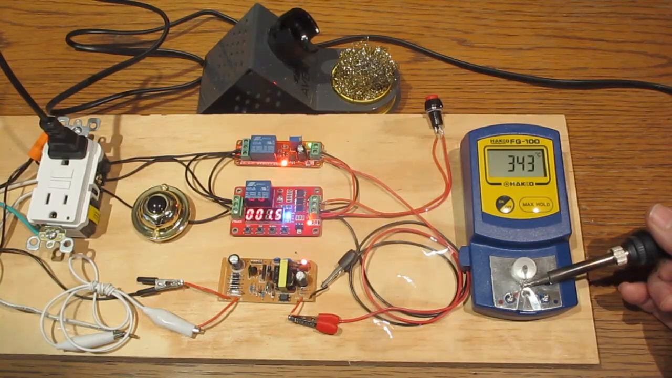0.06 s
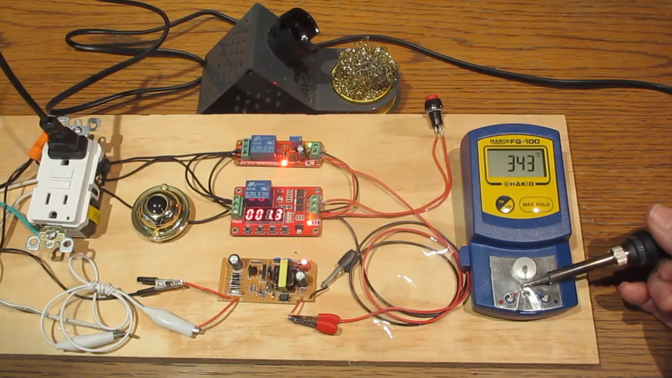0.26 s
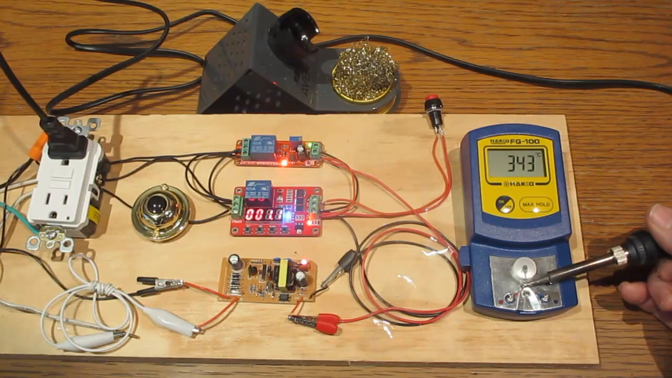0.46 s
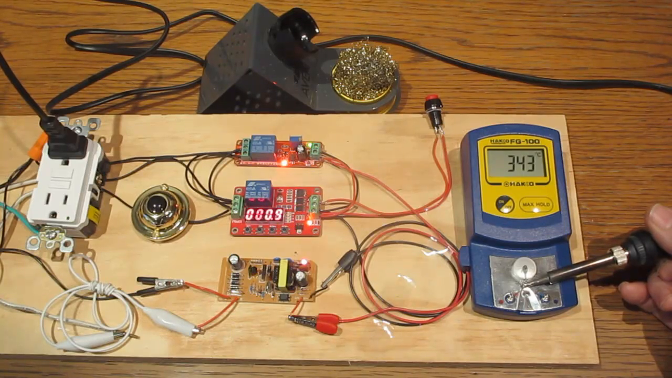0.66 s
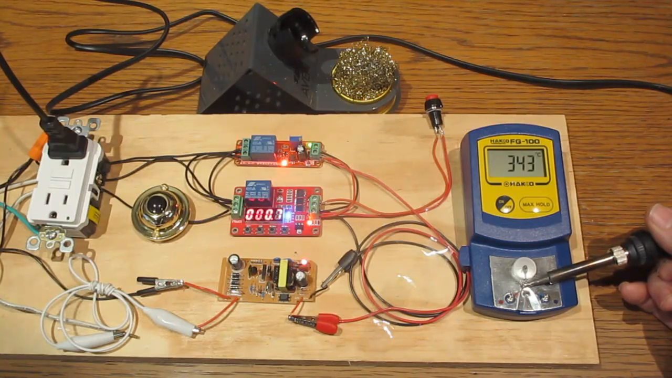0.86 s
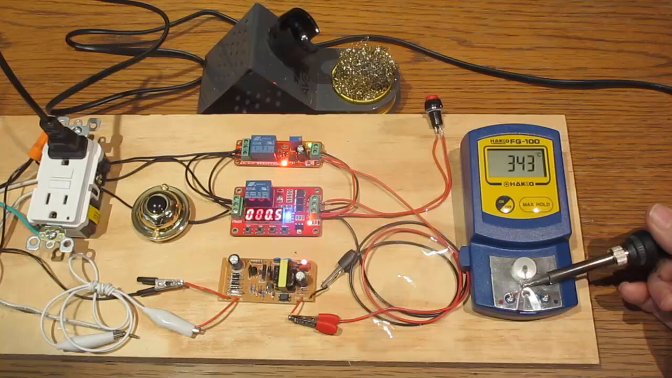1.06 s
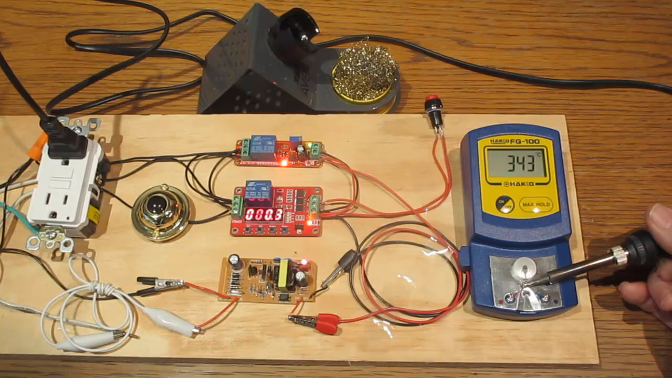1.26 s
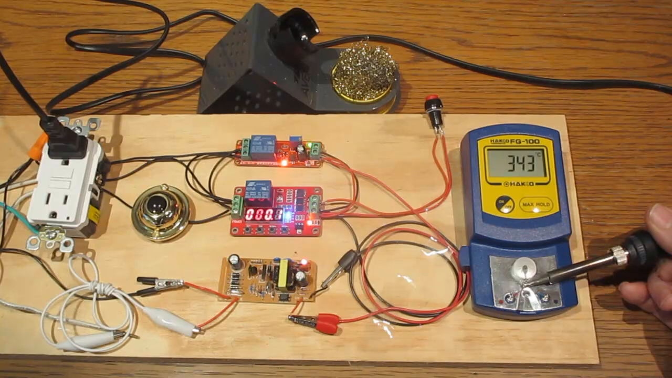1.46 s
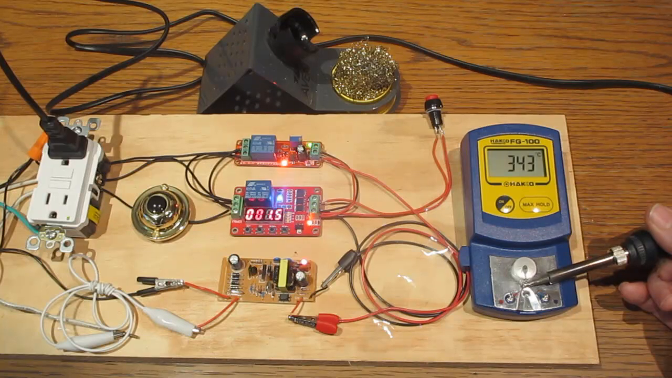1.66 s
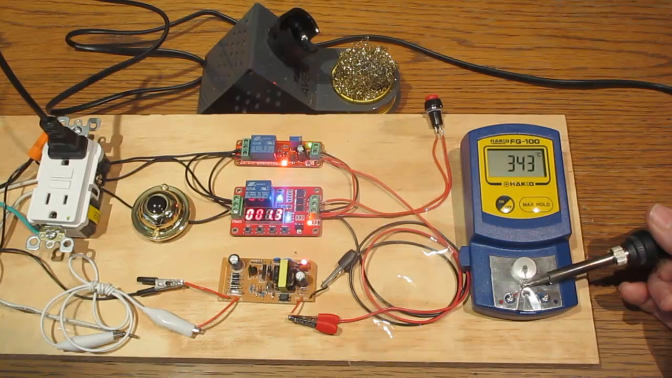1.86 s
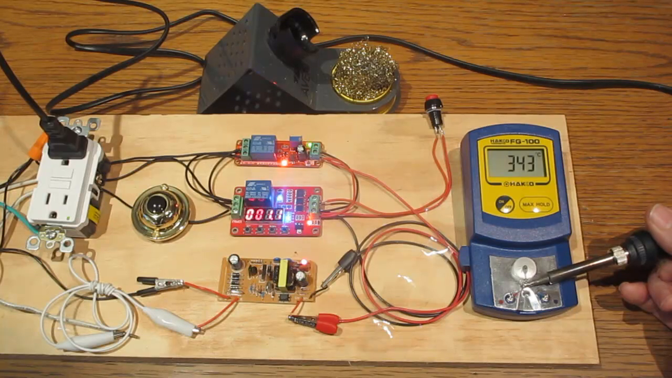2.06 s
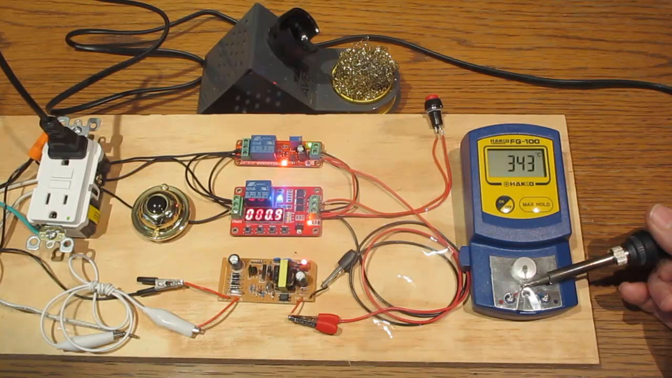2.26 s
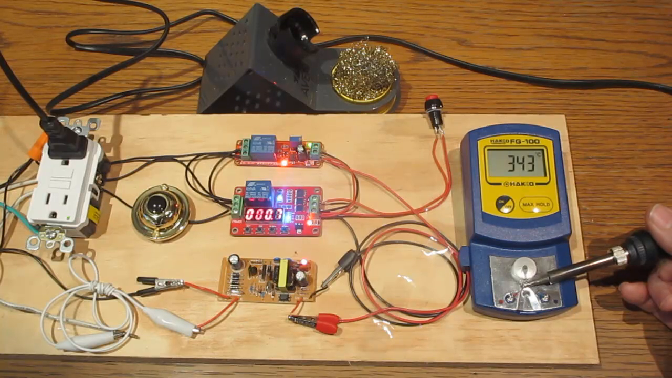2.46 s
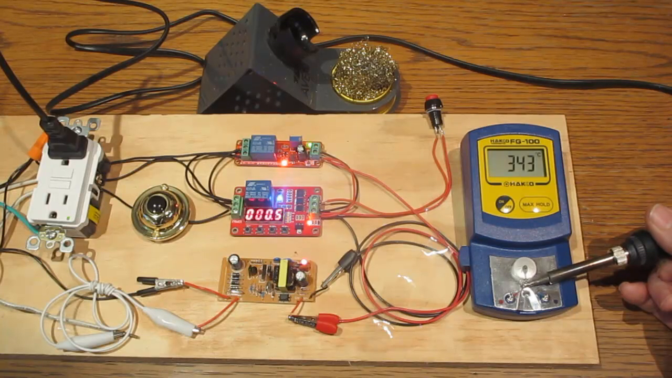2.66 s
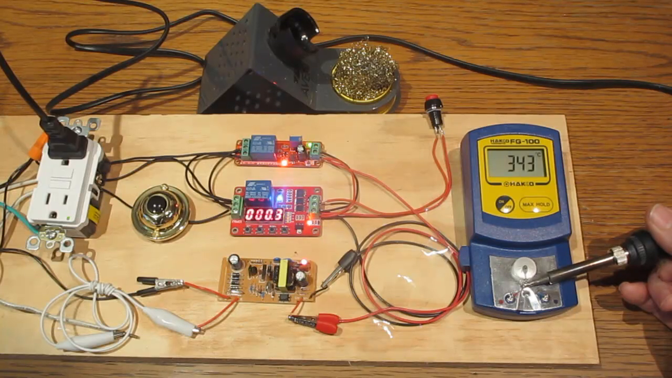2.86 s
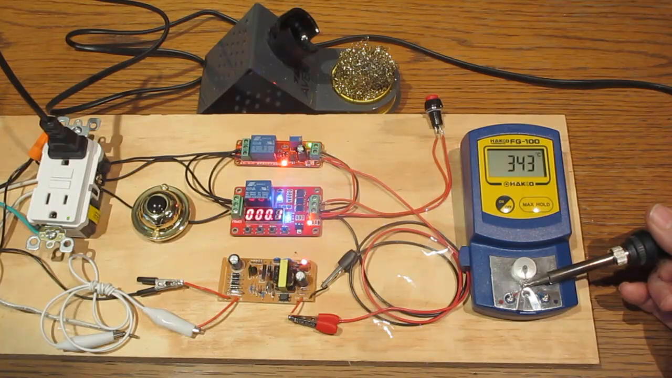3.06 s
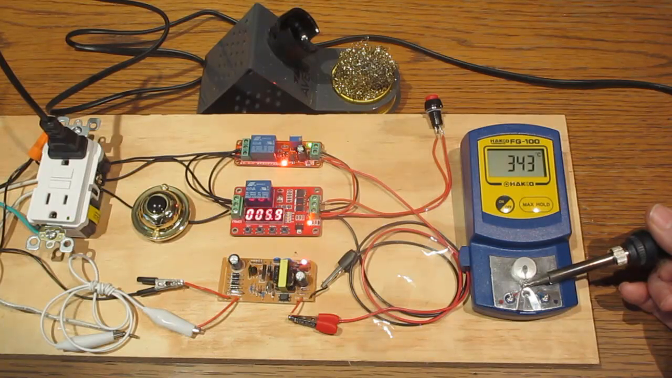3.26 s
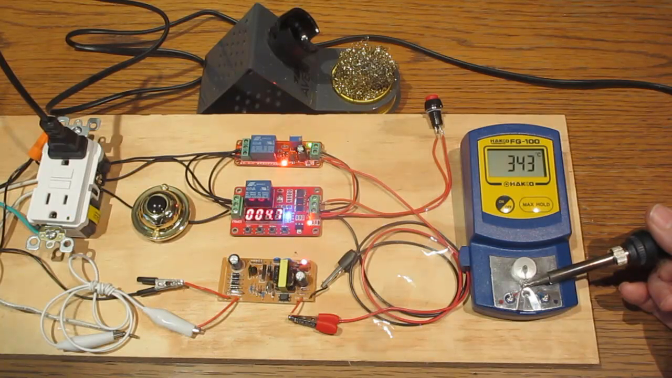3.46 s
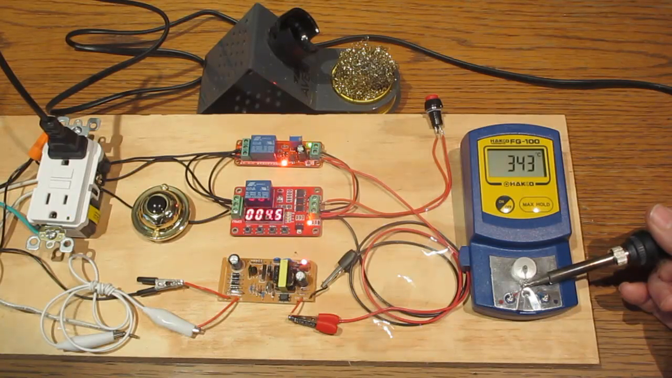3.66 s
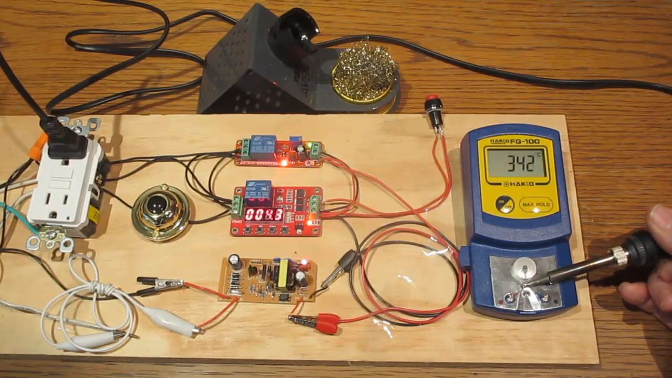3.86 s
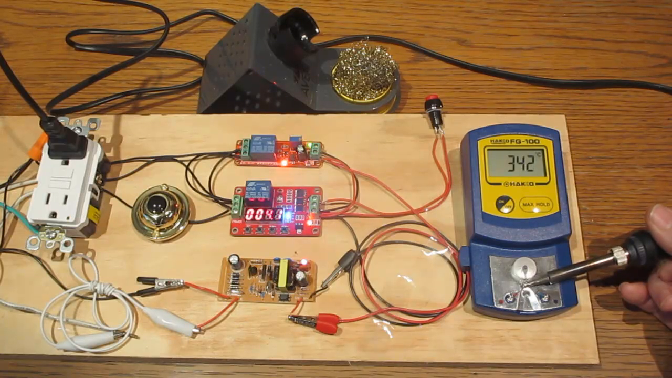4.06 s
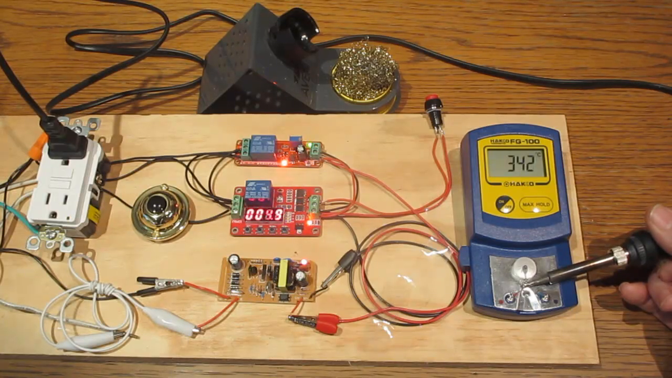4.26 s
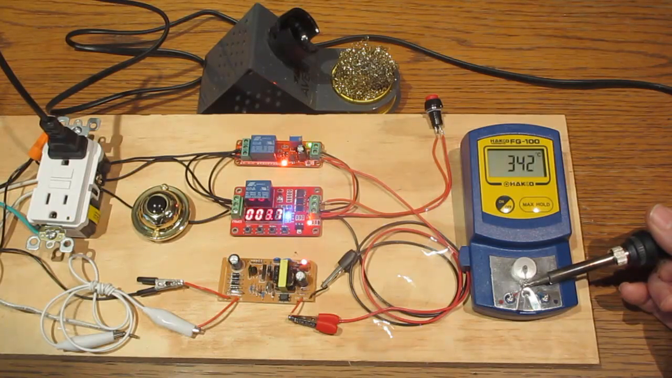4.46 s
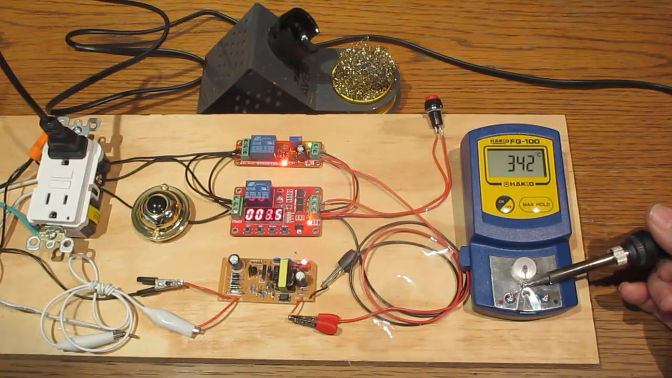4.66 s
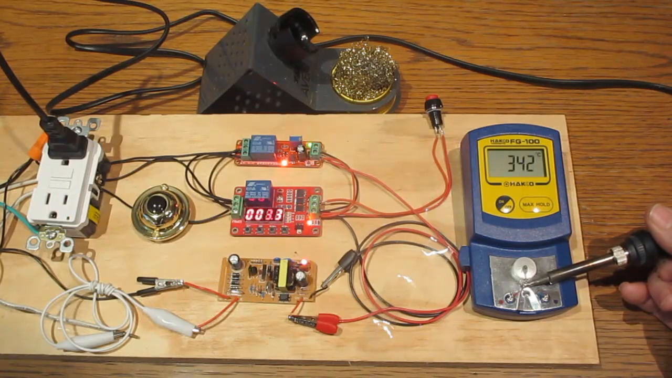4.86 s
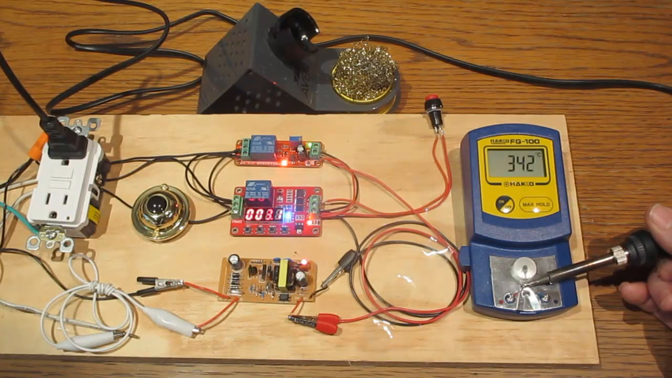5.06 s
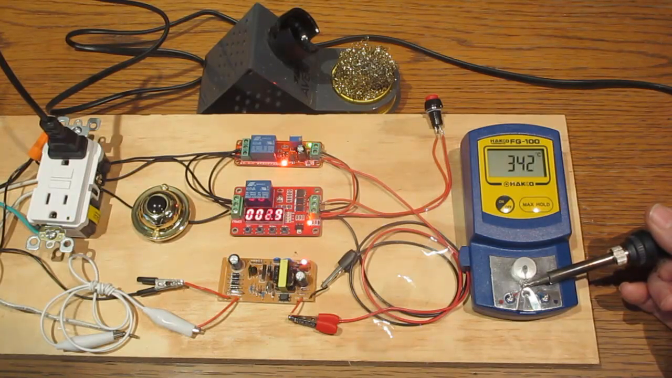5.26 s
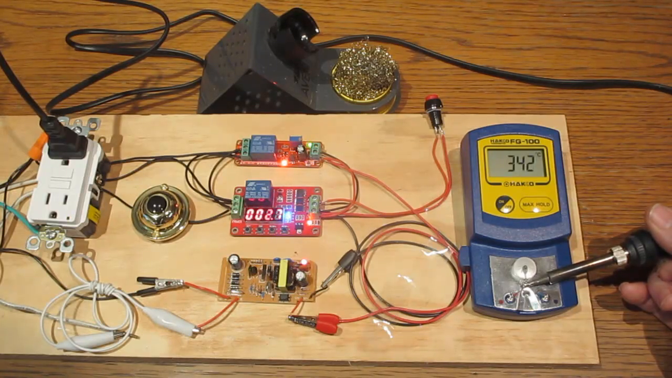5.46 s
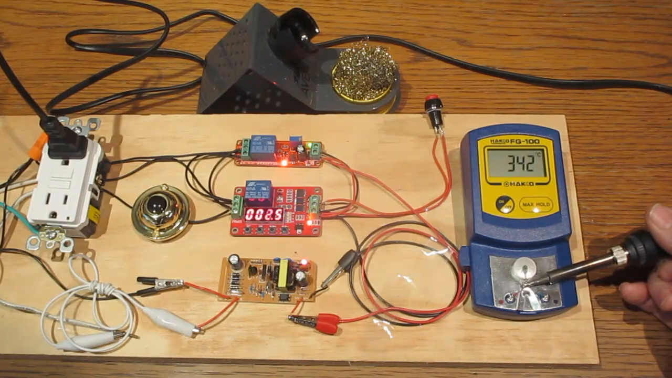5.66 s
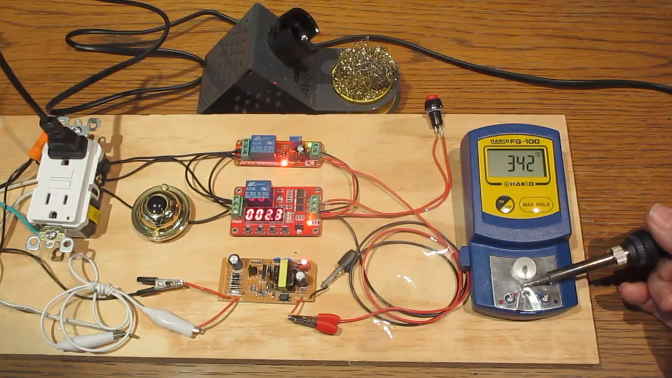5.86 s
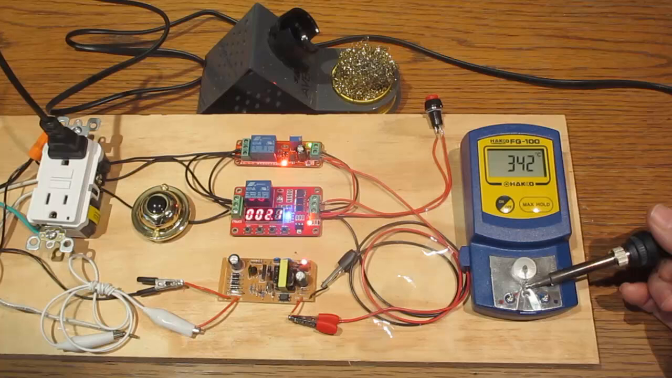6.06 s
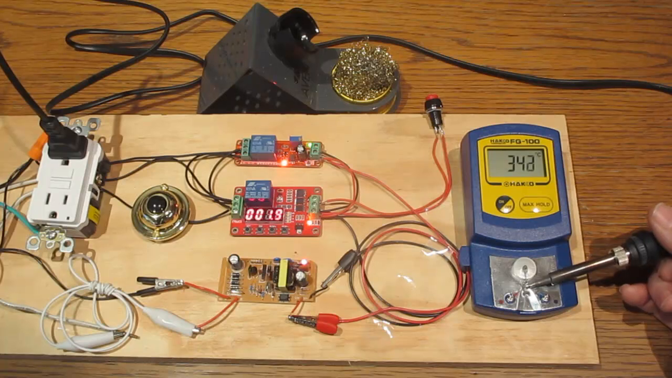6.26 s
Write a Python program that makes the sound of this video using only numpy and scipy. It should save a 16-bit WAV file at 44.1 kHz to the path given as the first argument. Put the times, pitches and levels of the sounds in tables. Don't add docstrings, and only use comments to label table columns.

```python
import sys
import numpy as np
from scipy import signal
from scipy.fft import rfft, irfft
from scipy.io import wavfile
from scipy.ndimage import uniform_filter1d

SR = 44100
rng = np.random.default_rng(int(sys.argv[2]) if len(sys.argv) > 2 else 0)


def to_wav(sig):
    pcm = np.clip(np.atleast_2d(sig), -1, 1) * 32767
    pcm = np.round(pcm).astype(np.int16)
    wavfile.write(sys.argv[1], SR, pcm.T)


def boost(x):
    u = np.asarray(x, float) / 20
    return 10 ** u


N = 278271
T = np.arange(N) / SR


def level(x, db):
    return x * boost(db) / np.sqrt(np.mean(x ** 2))


def curve(rows, rise_s, fall_s):
    total = 0
    for s, db in rows:
        after = np.maximum(T - s, 0) / fall_s
        before = np.minimum(T - s, 0) / rise_s
        total = total + boost(db) * np.exp(-after - before ** 2)
    return total


def colour(x, points, share=1):
    hz, db = np.transpose(points)
    f = np.maximum(np.fft.rfftfreq(N, 1 / SR), 1)
    gain_db = share * np.interp(np.log(f), np.log(hz), db)
    return irfft(rfft(x) * boost(gain_db), N)


def walk(rate):
    hold = int(SR / rate)
    steps = np.repeat(rng.standard_normal(N // hold + 1), hold)
    return 1.193 * uniform_filter1d(uniform_filter1d(steps, hold), hold)[:N]


def air():
    # pitch in Hz, level in dB per Hz.
    air_mid = [(88, -47.5), (150, -8), (208, -9.5), (240, -4), (272, -12), (303, -3), (326, -9.5),
               (494, -11), (521, -12.5), (581, -13.5), (1050, -17), (4080, -37.5), (8390, -41),
               (10200, -39), (11200, -40), (14600, -87), (22000, -120)]
    # pitch in Hz, level in dB per Hz.
    air_side = [(24, -35), (40, -35), (85, -28), (143, -21.5), (185, -18.5), (297, -7), (358, -2.5),
                (744, -6.5), (1040, 0.5), (1620, -10.5), (4360, -23), (8050, -25.5), (10400, -28.5),
                (11200, -42), (14600, -78), (22000, -120)]
    # pitch in Hz, left minus right in dB.
    air_balance = [(60, 0.0), (110, 0.0), (190, 0.0), (340, 0.0), (610, 0.0), (1090, 5.0), (1960, 1.5),
                   (3500, 0.0), (6250, 0.5), (11200, 0.0)]
    mid = level(colour(rng.standard_normal(N), [(90, -51.5)] + air_mid), -50.5)
    side = level(colour(rng.standard_normal(N), air_side), -57)
    left = colour(mid + side, air_balance, share=0.55)
    right = colour(mid - side, air_balance, share=-0.5)
    return np.array([left, right]) * boost(0.36 * walk(1.2))


def rumble():
    # pitch in Hz, level in dB per Hz.
    rumble_colour = [(20, -19.5), (35, 2.5), (48, 9), (65, 7.5), (80, 6), (97, 15.5), (115, 9), (140, 12),
                     (180, -9.5), (240, -41)]
    leaving_db, leaving_s = 6, 1.5
    rumble_db = -59 + leaving_db * np.exp(-T / leaving_s) + 0.7 * walk(3)
    return level(colour(rng.standard_normal(N), rumble_colour), 0) * boost(rumble_db)


def thuds():
    # moment in seconds, level in dB.
    knocks = [
        (.5, -48),
        (1.19, -55),
        (5.31, -61),
    ]
    thud_hz, thud_s = 95.9, 0.064
    return np.sqrt(2) * np.sin(2 * np.pi * thud_hz * T) * curve(knocks, thud_s, thud_s)


def duct():
    # pitch in Hz, width in Hz, level in dB.
    resonances = [(229.4, 13, -59), (268, 12, -58), (277, 3, -60), (1300, 120, -66.5)]
    out = np.zeros(N)
    for hz, width_hz, db in resonances:
        b, a = signal.iirpeak(hz, hz / width_hz, SR)
        out = out + level(signal.lfilter(b, a, rng.standard_normal(N)), db)
    return out


def beating(hums):
    first_hz = hums[0][0]
    out = np.zeros(N)
    for hz, db, s in hums:
        turns = first_hz * T + (hz - first_hz) * (T - s)
        out = out + np.sqrt(2) * boost(db) * np.sin(2 * np.pi * turns)
    return out


def transformers_and_blades():
    # pitch in Hz, level in dB, moment in step with the first in seconds.
    mains_hums = [(120.019, -54.7, 0), (120.116, -58.2, 7.82), (120.587, -62.5, .509)]
    # pitch in Hz, level in dB, moment in step with
    # the first in seconds.
    upper_hums = [(244.353, -56.7, 0), (240.041, -63.6, .0186), (245.086, -66.3, .648)]
    return beating(mains_hums) + beating(upper_hums)


def tone(hz, wobble_db, drift_hz):
    loudness = boost(wobble_db * walk(3.88))
    turns = np.cumsum(hz + drift_hz * walk(2.5)) / SR
    return np.sqrt(2) * loudness * np.sin(2 * np.pi * turns)


def machine_tones():
    # pitch in Hz, level in dB, wobble in dB, drift in Hz.
    tones = [(300.04, -55.2, .3, .02), (838.5, -72, 2, .5), (490.16, -61.3, .3, .02), (737, -74, 2, .6)]
    return sum(boost(db) * tone(hz, wobble_db, drift_hz) for hz, db, wobble_db, drift_hz in tones)


def scrape():
    # moment in seconds, level in dB.
    catches = [
        (5.943, -54.5),
        (5.952, -54),
        (5.969, -49),
        (5.990, -49.5),
    ]
    # pitch in Hz, level in dB per Hz.
    scrape_colour = [(410, -53.5), (700, -23.5), (759, -8), (881, 1.5), (1520, -11), (1860, -1.5),
                     (3280, -18), (3900, -12), (4600, -18), (5500, -11), (7610, -17.5), (8640, -16),
                     (10600, -23), (11000, -39), (14300, -62), (22000, -120)]
    grain_db = 1.4 * rng.exponential(size=N) + 1.1 * walk(400)
    shared, apart = rng.standard_normal((2, N)) * boost(grain_db)
    grains = shared + 0.58 * apart * np.array([[1], [-1]])
    return level(colour(grains, scrape_colour), 0) * curve(catches, rise_s=0.0058, fall_s=0.012)


def room(s, axis):
    # pitch in Hz, width in Hz, pull-in level in
    # dB, drop-out level in dB.
    tail = [(2750, 780, -57, -75), (3450, 450, -86, -51.5), (4420, 770, -42.5, -50.5),
            (5880, 1000, -45.5, -51), (7300, 830, -46.5, -53.5), (8700, 500, -48, -47),
            (10300, 1100, -40.5, -66), (1480, 780, -59.5, -54), (5150, 500, -65, -60),
            (6660, 700, -75, -69), (8350, 550, -70, -53), (9500, 600, -72.5, -62)]
    room_t60_s, early_t60_s, early_db = 0.23, 0.054, 6
    onset_s, alike = 0.003, 0.49
    t = T[:SR // 2]
    shared, left, right = rng.standard_normal((3, len(t)))
    echoes = np.sqrt(alike) * shared + np.sqrt(1 - alike) * np.array([left, right])
    coloured = np.zeros((2, len(t)))
    for band in tail:
        hz, width_hz = band[:2]
        sos = signal.butter(4, [hz - width_hz / 2, hz + width_hz / 2], "band", fs=SR, output="sos")
        coloured += level(signal.sosfilt(sos, echoes), band[axis])
    walls = np.exp(-np.log(1000) * t / room_t60_s)
    bench = boost(early_db) * np.exp(-np.log(1000) * t / early_t60_s)
    start = int(s * SR)
    out = np.zeros((2, N))
    out[:, start:start + len(t)] = coloured * (1 - np.exp(-t / onset_s)) * (walls + bench)
    return out


def strike(modes, bounces, axis):
    # pitch in Hz, left minus right in dB.
    port_balance = [(2000, -.5), (4400, -2.3), (6000, -2.6), (7300, .5), (7900, 2.5), (8660, 5),
                    (10000, 4.5), (11000, 2)]
    port_lag_s, contact_s = 26e-6, 0.00005
    modes = np.array(modes)
    hz, t60, mode_db = (modes[:, k, None] for k in (0, 1, axis))
    pan_db = np.interp(hz, *np.transpose(port_balance))
    scatter = rng.standard_normal((len(bounces), len(modes), 1))
    out = np.zeros((2, N))
    for (s, blow_db, bright_db), chance in zip(bounces, scatter):
        start = int(s * SR)
        gain_db = mode_db + blow_db + bright_db * np.log2(hz / 6000) + 1.29 * chance
        for ear, sign in enumerate((1, -1)):
            t = np.maximum(T[start:start + SR // 20] - s - ear * port_lag_s, 0)
            ring = np.sin(2 * np.pi * hz * t) * np.exp(-np.log(1000) * t / t60)
            ring = ring * (1 - np.exp(-t / contact_s))
            out[ear, start:start + len(t)] += np.sum(boost(gain_db + sign * pan_db / 2) * ring, axis=0)
    return out


def relay(bounces, axis):
    # pitch in Hz, time to fade by 60 dB in seconds, pull-in level in dB, drop-out level in dB.
    case_modes = [(2680, .008, -25, -13), (3600, .008, -28, -3.5), (3838, 0.0091, -24, -26),
                  (4380, 0.012, 1.5, 5), (4600, 0.008, -9.5, -24), (5650, 0.0085, -8, -9),
                  (5883, 0.011, -7, 0.5), (7400, 0.0079, -5, -23), (7885, 0.01, -5, -3),
                  (8650, .010, -5.5, 0), (9300, .010, -19.5, -32), (9660, .010, -18, -35),
                  (9900, 0.0096, -10.5, -39), (10270, 0.0092, -8.5, -23), (10600, 0.0097, -9, -22)]
    # pitch in Hz, time to fade by 60 dB in seconds, pull-in level in dB, drop-out level in dB.
    board_modes = [(420, 0.027, -45.5, -35), (1040, 0.025, -33.5, -21), (1406, 0.018, -31.5, -24.5),
                   (2047, 0.0099, -41.5, -24)]
    radiates_hz = 3340
    sos = signal.butter(2, radiates_hz, "high", fs=SR, output="sos")
    case = signal.sosfilt(sos, strike(case_modes, bounces, axis))
    return case + strike(board_modes, bounces, axis)


def scene():
    # moment in seconds, blow in dB, brightness in dB per octave.
    pull_in = [
        (1.6226, -8, 0),
        (1.6234, -22.5, 10.5),
        (1.6241, -20.5, 10),
        (1.6252, -25, 0.5),
        (1.6284, -35, -0.5),
        (1.6325, -42, 4),
    ]
    # moment in seconds, blow in dB, brightness in dB per octave.
    drop_out = [
        (3.2227, -47, -6),
        (3.2238, -25, 23),
        (3.2244, -24.5, -2),
        (3.2251, -39, -6),
        (3.2264, -29.5, 20),
        (3.2277, -23, 4.5),
        (3.2287, -31.5, 6),
        (3.2305, -39, -6),
        (3.2355, -47, -10.5),
    ]
    # moment in seconds, depth in dB.
    ducks = [
        (1.63, -1.2),
        (3.23, -.4),
    ]
    duck_back_s = 0.25
    clicks = relay(pull_in, axis=2) + relay(drop_out, axis=3)
    tails = room(pull_in[0][0], axis=2) + room(drop_out[1][0], axis=3)
    hum = rumble() + thuds() + duct() + transformers_and_blades() + machine_tones()
    duck_db = sum(db * (T > s) * np.exp(-np.maximum(T - s, 0) / duck_back_s) for s, db in ducks)
    background = (air() + hum) * boost(uniform_filter1d(duck_db, size=441))
    return clicks + tails + scrape() + background


def camera_thinning(x, size=2048):
    # pitch in Hz, level against the band's usual level in dB.
    weakest_kept = [(1500, -8), (3300, -2.6), (4400, -1.3), (6000, -1.8), (8000, -.8), (9000, 1.4),
                    (10000, 2.6), (10800, 3.2), (10950, 9)]
    mask_db, mask_hz, attack_db = -7, 2000, 9
    hz, _, z = signal.stft(x, SR, "cosine", size)
    power = np.mean(abs(z) ** 2, axis=0)
    band = uniform_filter1d(power, size=5, axis=0)
    usual = np.median(band, axis=1, keepdims=True)
    excess = np.maximum(power - 4 * usual, 0)
    masker = uniform_filter1d(excess, int(mask_hz * size / SR), axis=0) * boost(2 * mask_db)
    masker = masker * (hz > 1800)[:, None]
    quiet = usual * boost(2 * np.interp(hz, *np.transpose(weakest_kept)))[:, None]
    treble = power[hz > 3000].sum(axis=0)
    rise = treble > boost(2 * attack_db) * np.roll(treble, 1)
    first = rise & ~np.roll(rise, 1)
    attack = first | np.roll(first, 1)
    audible = (uniform_filter1d(power, size=7, axis=0) > masker) & (band > quiet)
    return signal.istft(z * (audible | attack), SR, "cosine", size)[1][:, :N]


def roll_off(x):
    return signal.sosfilt(signal.butter(12, 11770, fs=SR, output="sos"), x)


def record(dry):
    top_hz = 11950
    sos = signal.cheby2(14, 75, top_hz, fs=SR, output="sos")
    mix = camera_thinning(signal.sosfilt(sos, dry))
    return roll_off(mix)


dry = scene()
out = record(dry)
to_wav(out)
```